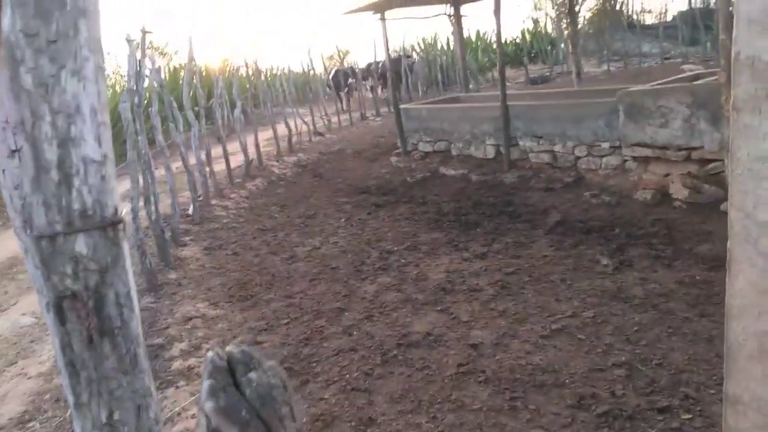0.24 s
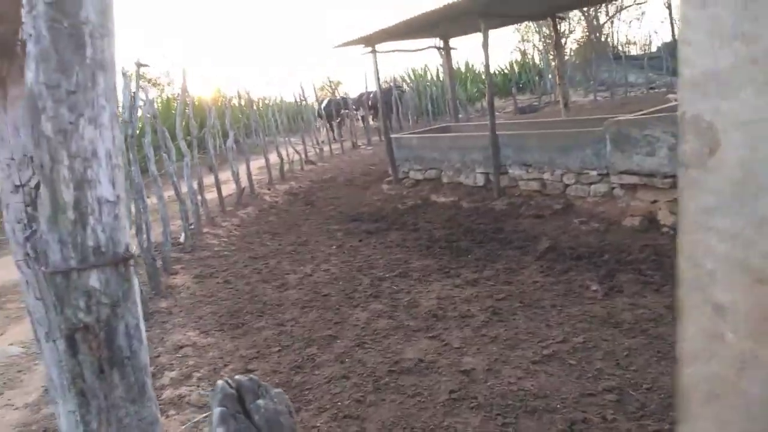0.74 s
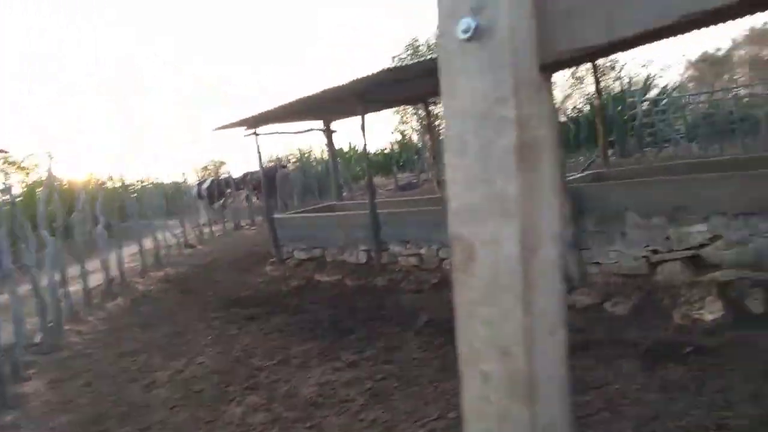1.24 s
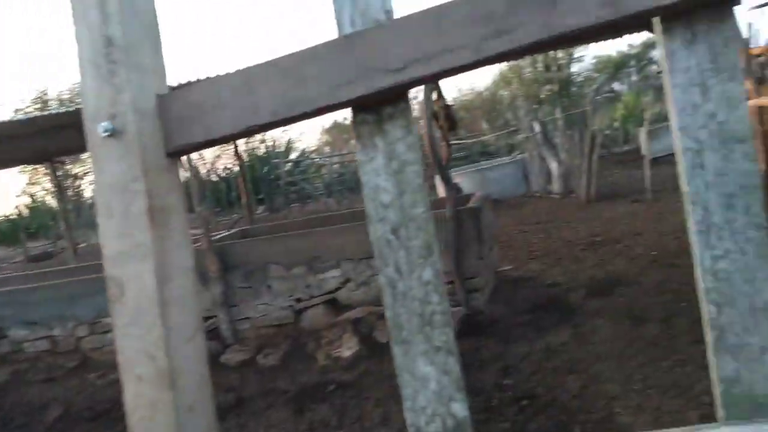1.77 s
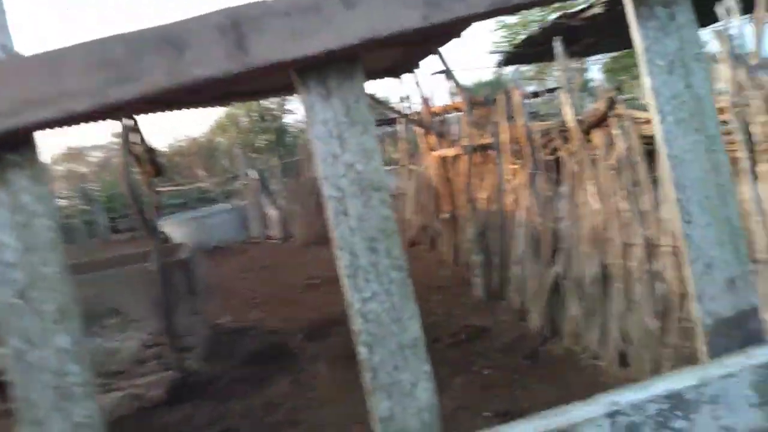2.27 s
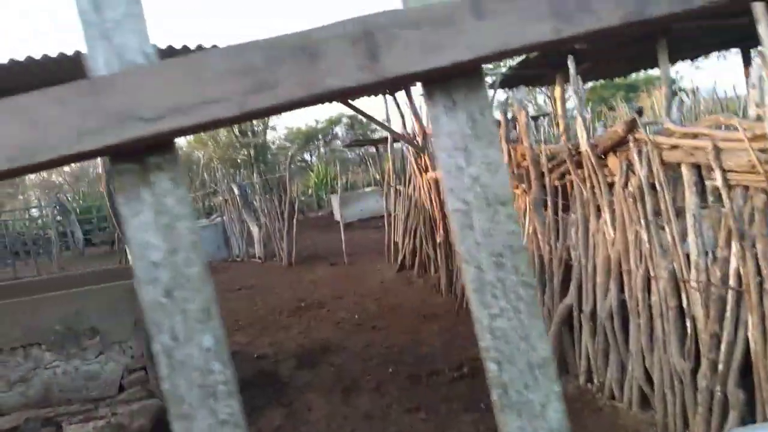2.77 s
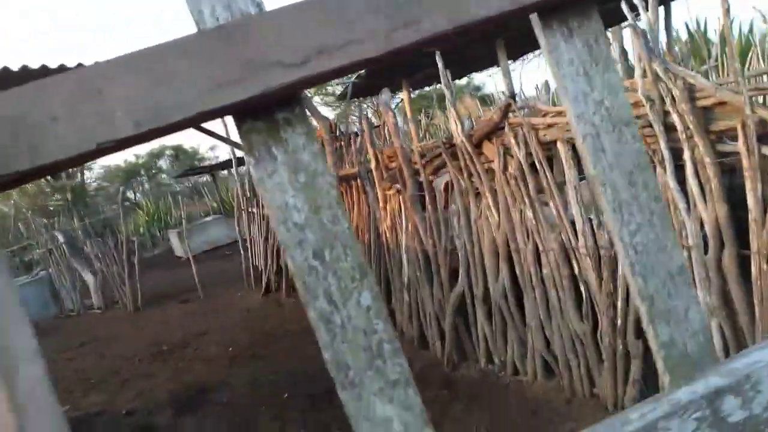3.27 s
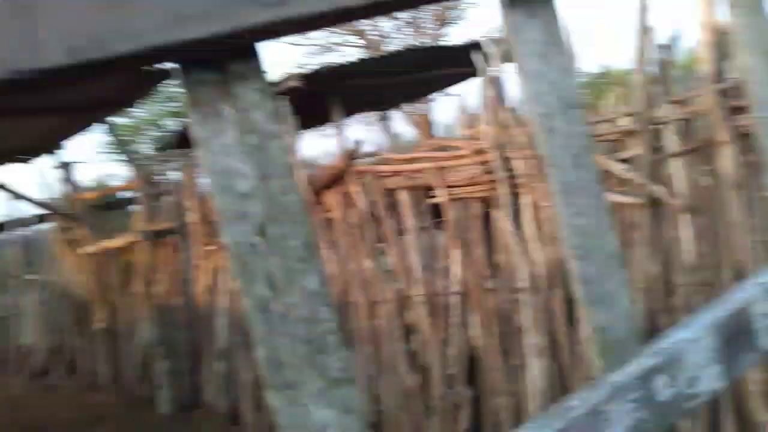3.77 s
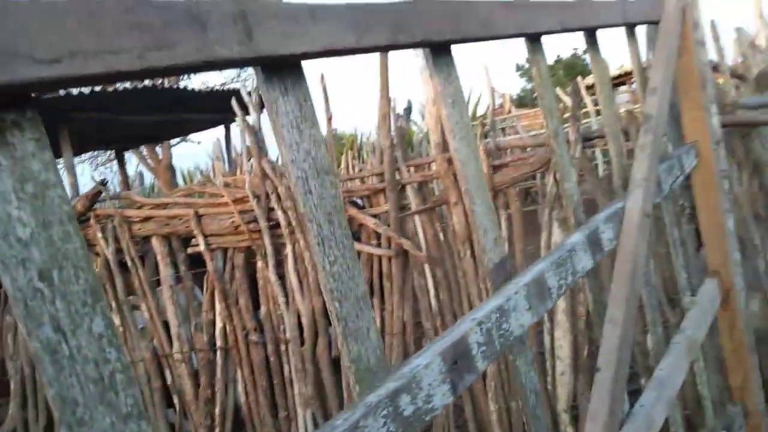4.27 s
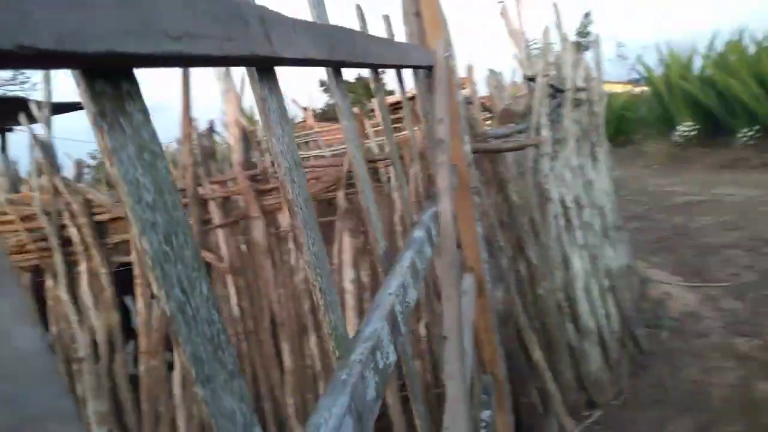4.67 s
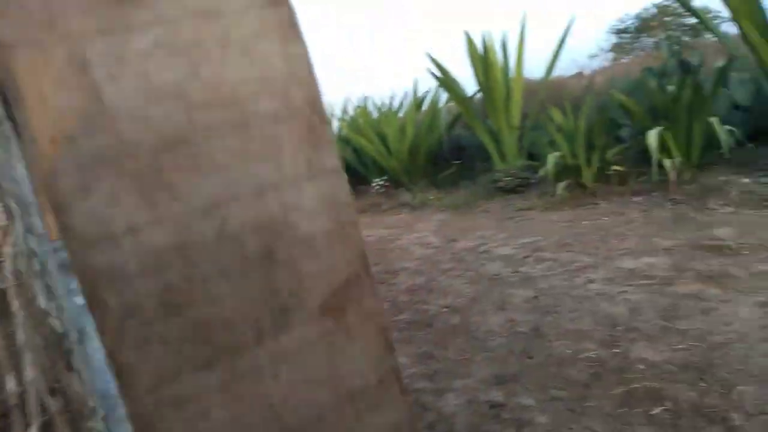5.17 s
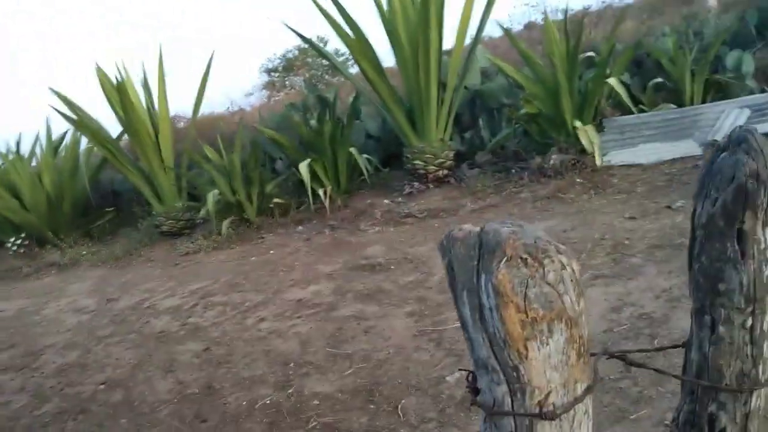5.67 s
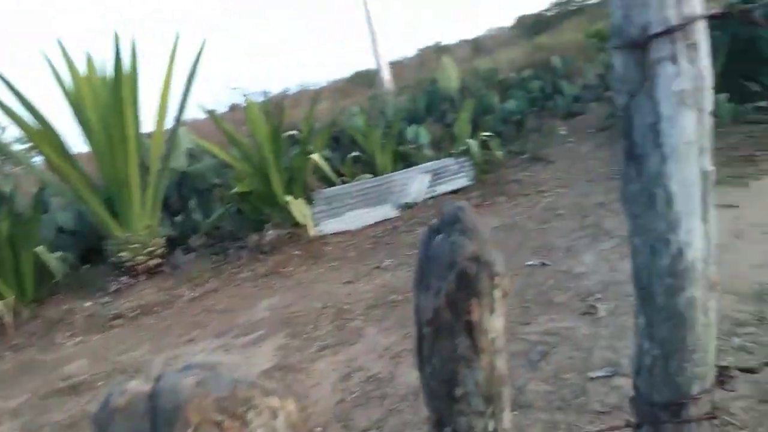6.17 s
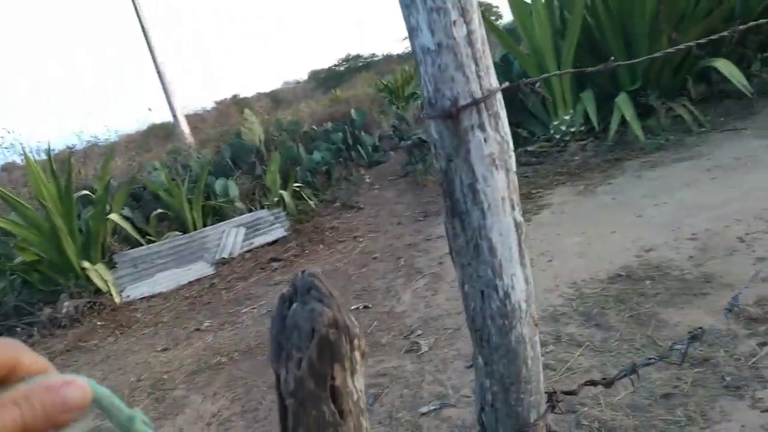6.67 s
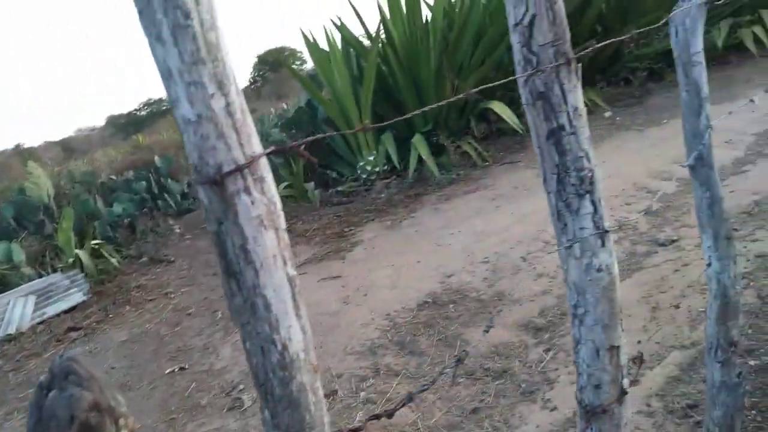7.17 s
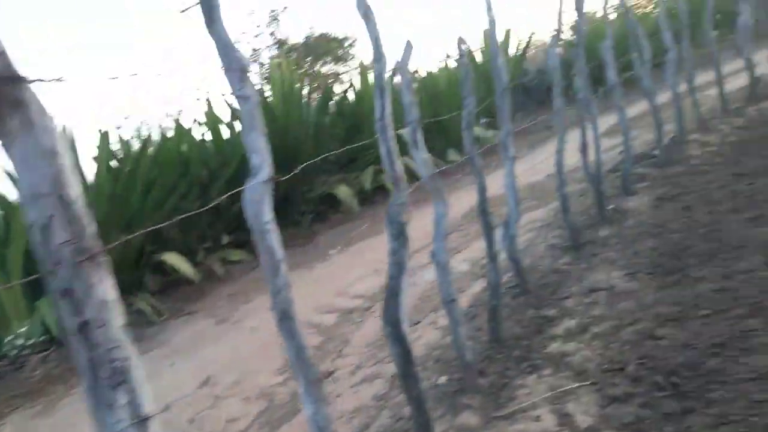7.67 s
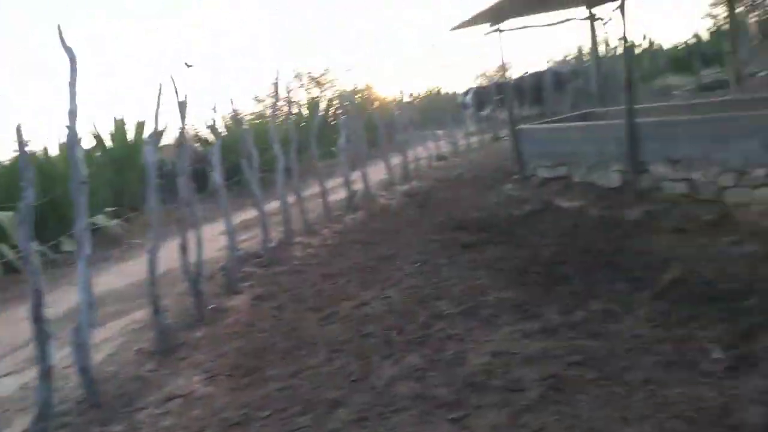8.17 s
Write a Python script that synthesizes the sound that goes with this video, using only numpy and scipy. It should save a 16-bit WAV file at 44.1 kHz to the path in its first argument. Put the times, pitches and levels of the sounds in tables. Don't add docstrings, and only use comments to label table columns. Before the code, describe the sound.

Outdoor cattle pen: a near cow moos, wind buffets the microphone, a wooden gate creaks, another low moo, then a hard wooden knock.

```python
import sys
import numpy as np
from scipy import signal
from scipy.fft import rfft, irfft, next_fast_len
from scipy.io import wavfile
from scipy.ndimage import uniform_filter1d

SR = 44100
rng = np.random.default_rng(int(sys.argv[2]) if len(sys.argv) > 2 else 0)


def nominal_scale(level):
    x = np.asarray(level, float) / 20
    return 10 ** x


def dump_mix(stems):
    frames = np.atleast_2d(stems).T
    limited = np.clip(frames, -1, 1)
    pcm = np.round(limited * 32767).astype(np.int16)
    wavfile.write(sys.argv[1], SR, pcm)


N = 372204


def evened(x):
    return x / np.sqrt(np.mean(x ** 2) + 1e-20)


def read(points, hz):
    f, value = np.transpose(points)
    return np.interp(np.log(hz + 1), np.log(f + 1), value)


def add(mix, s, sound):
    part = mix[..., max(round(s * SR), 0):][..., :sound.shape[-1]]
    part += sound[..., :part.shape[-1]]


def drift(size, per_s):
    knots = rng.standard_normal(int(size / SR * 200) + 3)
    return np.interp(np.arange(size) / SR * per_s, np.arange(len(knots)), knots)


def filtered(x, response):
    size = next_fast_len(x.shape[-1] + 4096)
    spectrum = rfft(x, size) * response(np.fft.rfftfreq(size, 1 / SR))
    return irfft(spectrum, size)[..., :x.shape[-1]]


def ports(x, lag_ms, tilt_db):
    right = filtered(x, lambda hz: np.exp(-2j * np.pi * hz * lag_ms / 1000))
    return np.array([x * nominal_scale(tilt_db / 2), right * nominal_scale(-tilt_db / 2)])


def ring(points):
    log_gain = read(points, np.fft.rfftfreq(2048, 1 / SR)) * np.log(10) / 20
    full = np.concatenate([log_gain, log_gain[-2:0:-1]])
    return np.fft.ifft(np.exp(np.conj(signal.hilbert(full)))).real[:1024]


def yard(x, t60, start_ms):
    t = np.arange(SR // 2) / SR
    taps = rng.standard_normal((2, len(t))) * (rng.random((2, len(t))) < .05)
    taps = taps * nominal_scale(-60 * t / t60) * (t > start_ms / 1000)
    wet = signal.fftconvolve(x[None], taps / np.linalg.norm(taps[0]), axes=1)[:, :N]
    return filtered(wet, lambda hz: 1 / (1 + (hz / 3500) ** 2))


def swells(rows, rest_db):
    t = np.arange(0, N + 256, 256) / SR
    power = sum(nominal_scale(db - 20 * abs((t - s) / sink_s) ** 1.3) ** 2 for s, db, sink_s in rows)
    return np.interp(np.arange(N) / SR, t, 10 * np.log10(power + nominal_scale(rest_db) ** 2))


def moo(rows, mouth, throat, order, gain_db, jitter, breath_db):
    s, *columns = np.transpose(rows)
    t = np.arange(s[0], s[-1], 1 / SR)
    hz, level_db, bright_db = (np.interp(t, s, c) for c in columns)
    at, opening, scale = np.transpose(mouth)
    wide = np.clip(np.interp(t, at, opening), 0, 1)
    shift = np.interp(t, at, scale)

    def colour(f):
        return (1 - wide) * read(throat[0], f) + wide * read(throat[1], f / shift)

    def lift(f):
        return bright_db * np.clip(np.log2(f / 450), -1, 1) / 2

    def end_loss(f):
        return -2.5 * f / 1000 + 20 * np.minimum(np.log2(f / 165), 0)

    turns = np.cumsum(hz * (1 + jitter * drift(len(t), 59.85))) / SR
    puffs = uniform_filter1d(rng.standard_normal(len(t)), 60) * 8 * nominal_scale(breath_db)
    voice = np.zeros(len(t))
    for k in range(1, 30):
        db = level_db + gain_db + colour(k * hz) - colour(order * hz)
        db = db + lift(k * hz) + end_loss(k * hz) + 1.57 * drift(len(t), 12.96)
        tone = np.sqrt(2) * np.cos(2 * np.pi * (k * turns + rng.random()))
        voice += nominal_scale(db) * (1 + np.roll(puffs, 977 * k)) * tone
    out = np.zeros(N)
    add(out, s[0], voice * signal.windows.tukey(len(t), .05))
    return out


def near_cows():
    # (time [s], pitch [Hz], level of the reference harmonic [dB], brightness [dB])
    call_a = [(.36, 89.9, -59, -12), (.52, 106.9, -54.5, -13), (.565, 127.8, -40.5, -5.5),
              (.675, 158.6, -38.5, 13), (.76, 163.7, -41.5, 21), (1.12, 165.7, -41.5, 17.5),
              (1.35, 170.2, -49, 11), (1.44, 174.2, -53.5, 8), (1.53, 167.7, -56, 12)]
    call_b = [(5.6, 107, -86, -16), (5.77, 126.5, -68, -3), (6.1, 142.3, -61.5, -1.5),
              (6.22, 141.4, -58.5, -0.5), (6.3, 143.1, -48, -1.5), (6.6, 142, -50.5, -4.5),
              (6.712, 136.8, -53.5, -11.5), (6.76, 123, -56.5, -20), (6.79, 113, -72.5, -27)]
    groan = [(1.46, 161.6, -57, 20), (1.52, 156.4, -52.5, 17), (1.585, 155.7, -51, 14.5),
             (1.7, 159.5, -65, 13), (1.8, 169.8, -58, 11), (1.9, 175.4, -64, 7.6), (2.0, 178.5, -70, 6.1)]
    # (time [s], 0 narrow - 1 wide, upward shift of the resonances [ratio])
    mouth_a = [(.9, .05, 1.0), (1.1, .4, 1.0), (1.28, .95, 1.0), (1.43, .9, 1.0), (1.51, .05, 1.0)]
    mouth_b = [(5.9, 0.013, 1.4), (6.23, 0.071, 0.93), (6.28, 0.65, 1.054), (6.5, 0.75, 1.045),
               (6.7, 0.8, 1.093), (6.76, 0.71, 1.1), (6.802, 0.99, 0.94)]
    # (frequency [Hz], level [dB])
    throat_a = [(163, 7.5), (326, -2.5), (489, -23.5), (652, -65), (815, -40.5), (978, -23), (1141, -30),
                (1304, -33), (1630, -39), (1956, -36.5), (2282, -44), (2771, -43), (3423, -51),
                (4564, -47)], [(169, 5), (338, -14.5), (507, -26.5), (676, -30.5), (845, -40),
                (1014, -39.5), (1183, -26), (1352, -39), (1521, -35.5), (1690, -37), (2028, -37),
                (2366, -46), (2873, -59), (3549, -60.5), (4732, -69)]
    throat_b = [(140, 2.5), (281, -15.5), (422, -20.5), (562, -32), (702, -24), (843, -36), (984, -25.5),
                (1124, -30.5), (1405, -20.5), (1686, -43), (1967, -45), (2388, -35), (2950, -31),
                (3934, -38)], [(142, -11.5), (284, -30), (426, 4.5), (495, 1), (568, -19), (710, -15),
                (852, -37.5), (994, -16), (1136, -17.5), (1420, -5), (1704, -7.5), (1880, 0.5), (2100, -21),
                (2414, -23), (2982, -31), (3976, -28)]
    throat_groan = [[(160, 2), (320, -6.5), (480, -25), (780, -47), (960, -20), (1080, -25.5), (1150, -37),
                    (1400, -44.5)]] * 2
    a = moo(call_a, mouth_a, throat_a, order=2, gain_db=4.5, jitter=.006, breath_db=-30.5)
    a = a + moo(groan, mouth_a, throat_groan, order=2, gain_db=2, jitter=.0052, breath_db=-25)
    b = moo(call_b, mouth_b, throat_b, order=10, gain_db=-1.5, jitter=.0031, breath_db=-45)
    return ports(a, -.06, 1.5) + ports(b, -.05, 1.6) + nominal_scale(-11) * yard(a + b, .4, 6)


def far_hum():
    # (time [s], pitch [Hz], level [dB])
    hums = [
        [(0.0, 132.6, -59), (0.332, 137.8, -55), (0.62, 151, -53)],
        [(2.6, 158, -66), (3.062, 152.2, -57), (3.7, 132.6, -62.5)],
        [(3.9, 146.7, -63.5), (4.394, 150.9, -66.5), (5.75, 141, -61.5)],
    ]
    out = np.zeros(N)
    for rows in hums:
        s, hz, db = np.transpose(rows)
        t = np.arange(s[0], s[-1], 1 / SR)
        wavering_hz = np.interp(t, s, hz) * (1 + .011 * drift(len(t), 28.1))
        phase = 2 * np.pi * np.cumsum(wavering_hz) / SR
        tone = np.sin(phase) + nominal_scale(-20.5) * np.sin(2 * phase)
        level = nominal_scale(np.interp(t, s, db) + 14.5 + 1.9 * drift(len(t), 11.76))
        add(out, s[0], tone * level * signal.windows.tukey(len(t), .15))
    return ports(out, .05, .1)


def hinge_slips():
    # (time [s], peak level [dB])
    single = [(2.184, -23.5), (2.266, -25.5), (2.354, -29), (2.43, -24.5), (2.486, -32.5), (2.525, -27),
              (2.563, -25), (2.602, -24), (2.641, -23.5), (2.673, -28.5), (2.695, -30), (2.713, -34.5),
              (2.726, -31.5), (2.75, -33), (3.171, -37.5), (3.189, -33), (3.211, -36), (3.23, -34),
              (3.253, -36.5), (3.286, -33.5), (3.306, -37.5), (3.339, -36), (3.382, -35), (3.434, -33.5),
              (3.478, -35.5), (3.521, -34.5), (3.566, -32), (3.6, -33.5), (3.697, -35), (3.738, -32.5)]
    # (time [s], peak level [dB])
    quick = [(2.768, -38.5), (2.786, -40), (2.807, -44), (2.824, -42.5), (2.843, -47), (2.861, -44),
             (2.874, -42), (2.8961, -42), (2.9147, -44.5), (2.929, -44), (2.947, -44.5), (2.959, -47),
             (2.972, -42.5), (2.992, -45), (3.01, -41.5), (3.026, -43), (3.047, -46), (3.062, -45),
             (3.076, -48), (3.088, -46.5), (3.104, -41.5), (3.117, -44.5), (3.128, -45.5), (3.143, -44),
             (3.157, -42), (3.62, -42), (3.639, -44), (3.657, -42), (3.678, -46.5), (3.718, -46)]
    # (start [s], end [s], gap between slips [s], first level [dB], last level [dB])
    rasps = [(3.752, 3.868, .0145, -41.5, -52)]
    rub_single, rub_rasp = .2, .9
    slips = [(s, db, rub_single) for s, db in single] + [(s, db, rub_rasp) for s, db in quick]
    for start, end, gap_s, first_db, last_db in rasps:
        nudge = rng.uniform(-1, 1, 20)
        s = start + gap_s * (np.arange(20) + .22 * nudge)
        db = np.interp(s, [start, end], [first_db, last_db]) + 1.2 * rng.standard_normal(20)
        slips += [(at, level, rub_rasp) for at, level in zip(s, db) if at < end]
    return slips


def gate():
    # (frequency [Hz], level at slow swing [dB], level at quick swing [dB], time to fall 110
    # dB [s])
    modes = [(560, -4.5, -7, 0.043), (777, -5.5, -2, 0.055), (990, 2, 2.5, 0.078), (1220, -6, -4.5, 0.054),
             (1660, 10.5, 3, 0.038), (1795, -1, 5, 0.036), (1960, -0.5, 6, 0.024),
             (3450, -11.5, -6.5, 0.018), (2370, -9.5, -1.5, 0.048), (2950, -17, -10.5, 0.01),
             (3820, -19.5, -7.5, 0.0061), (5050, -19.5, -13, 0.014), (5360, -23, -12, 0.01),
             (6065, -13, -11.5, 0.0096)]
    snap_gain, loose = 4.5, .55
    rounds_per_s = 7.3
    t = np.arange(1200) / SR
    shape = (t / .0036) ** 2 * np.exp(2 - t / .0015)
    snap = np.exp(-((t - .0025) * SR / 1.5) ** 2)
    drive = np.zeros((2, N))
    for s, db, rub in hinge_slips():
        quick = np.clip((s - 2.45) / .24, 0, 1)
        grind = shape + rub * quick * np.exp(-t / .014)
        rattle = (loose + (1 - loose) * quick) * rng.standard_normal(len(t)) * grind
        slip = (snap_gain * (1 - .5 * quick) * snap + rattle) * nominal_scale(db)
        add(drive, s - .002, np.array([[1 - quick], [quick]]) * slip)

    t = np.arange(4000) / SR
    bare_tick = drive.sum(0)
    creak = nominal_scale(-19) * bare_tick
    for k, (hz, slow_db, quick_db, t60) in enumerate(modes):
        mode = (-1) ** k * nominal_scale(-110 * t / t60) * np.sin(2 * np.pi * hz * t) * .024 / t60
        creak = creak + nominal_scale(-19) * signal.oaconvolve(nominal_scale([slow_db, quick_db]) @ drive, mode)[:N]

    def board_colour(hz):
        return nominal_scale(12.5) * (hz / 380) ** 2 / (1 + (hz / 380) ** 2) / (1 + (hz / 1700) ** 2)

    boards = filtered(bare_tick, board_colour)
    dull = filtered(nominal_scale(-13) * creak + boards, lambda hz: 1 / (1 + (hz / 2300) ** 2))
    turn = np.pi * rounds_per_s * np.arange(N) / SR
    tail = sum(yard(dull * np.cos(turn + k * np.pi / 3), .16, 3) for k in range(3))
    left, right = ports(creak, .4303, 7)
    right = filtered(right, lambda hz: nominal_scale(-8.5 * np.exp(-((hz - 1750) / 380) ** 2)))
    direct = np.array([left, right]) * nominal_scale(-2)
    return direct + nominal_scale(-9) * yard(creak, .028, .6) + nominal_scale(-5.5) * tail


def knocks():
    # (time [s], peak level [dB], main ring [Hz], t60 [s], lag of the right port [ms])
    blows = [
        (0.608, -45, 1050, 0.11, 0.051),
        (0.897, -17.5, 998, 0.41, 0.12),
        (0.906, -21, 560, 0.34, 0.2),
        (3.742, -35, 990, 0.045, 0.012),
        (6.8186, -9.5, 968, 0.24, -0.06),
        (6.851, -20.5, 600, 0.073, -0.32),
        (6.882, -26.5, 895, 0.11, -0.39),
        (8.041, -35.5, 1480, 0.015, -0.021),
    ]
    # (frequency [Hz], level [dB])
    wood_colour = [(200, 1.5), (300, 8), (500, -1), (750, -4.5), (1000, -6), (1300, -9), (1650, -5),
                   (2000, -6), (2500, -14.5), (3200, -23.5), (4000, -17), (5000, -26.5), (7000, -34.5),
                   (10000, -31), (14000, -48)]
    out = np.zeros((2, N))
    t = np.arange(5000) / SR
    wood = ring(wood_colour)
    wood = wood / np.linalg.norm(wood)
    for s, db, hz, t60, lag_ms in blows:
        force = t / .003 * np.exp(1 - t / .003) + .25 * nominal_scale(-60 * t / t60)
        body = signal.oaconvolve(rng.standard_normal(len(t)) * force, wood)[:len(t)]
        swell = np.sin(np.pi * np.minimum(t / .0062, 1) ** 1.32) ** .71
        tone = .52 * np.sin(2 * np.pi * hz * t * (1.18 - 25 * t)) * swell
        knock = nominal_scale(db - 2.5) * (.3 * body + tone) * np.minimum(t * 1000, 1)
        add(out, s - .001, ports(knock, lag_ms, 2.5))
    return out + nominal_scale(-16.5) * yard(out[0], .017, .5) + nominal_scale(-12) * yard(out[0], .094, 6.8)


def scuffs():
    # (time [s], peak level [dB], centre [Hz], length [s], width [octaves])
    bursts = [(0.138, -48, 1290, 0.035, 0.61), (0.186, -58, 1700, 0.092, 1.4),
              (0.159, -57, 1540, 0.08, 0.14), (0.42, -58.5, 1700, 0.036, 1.3),
              (1.694, -51.5, 660, 0.02, 0.42), (1.987, -54.5, 648, 0.028, 0.25),
              (0.323, -53.5, 1430, 0.055, 1), (0.606, -39.5, 1150, 0.032, 1),
              (0.816, -43.5, 2700, 0.015, 0.36), (0.825, -54, 1988, 0.11, 1.51),
              (1.075, -55, 3640, 0.017, 0.097), (1.317, -42, 1480, 0.023, 0.33),
              (4.278, -58.5, 1140, 0.11, 0.66), (4.632, -60, 1407, 0.055, 1.4),
              (5.229, -52.5, 1117, 0.043, 0.57), (5.271, -58.5, 1070, 0.33, 0.73),
              (5.271, -50.5, 1290, 0.017, 0.5), (5.309, -60, 1500, 0.012, 0.55),
              (5.383, -51, 1500, 0.013, 0.56), (5.357, -55, 1520, 0.061, 0.63),
              (5.722, -53, 1240, 0.026, 0.69), (5.826, -62, 3200, 0.13, 0.42),
              (5.87, -64, 5000, 0.069, 0.25), (5.936, -60, 3200, 0.068, 0.24),
              (5.97, -59, 4930, 0.043, 0.2), (6.334, -58.5, 5100, 0.08, 0.47),
              (6.037, -45, 1280, 0.051, 0.84), (6.042, -47, 3770, 0.031, .5),
              (7.004, -61, 3200, .016, 0.35), (7.048, -57.5, 3720, 0.013, 0.22),
              (7.249, -62, 1490, 0.03, 0.5), (7.291, -56, 1300, 0.18, 0.81), (7.341, -51, 1620, 0.058, 1.5),
              (7.4, -60, 3600, 0.0099, .3), (7.448, -59, 2800, 0.068, 1.3),
              (7.455, -57.5, 1360, 0.057, 0.61), (7.652, -61, 2760, 0.087, 1.2),
              (7.769, -58.5, 900, 0.023, 0.74), (7.88, -58.5, 1220, 0.046, 1),
              (7.922, -41, 8900, 0.0029, 1.1), (7.955, -58, 8000, 0.0072, .4),
              (7.988, -57.5, 1320, 0.089, 1), (8.077, -60.5, 3500, 0.026, 1),
              (8.165, -57, 2190, 0.0079, 0.45)]
    out = np.zeros((2, N))
    t = np.arange(6000) / SR
    for s, db, hz, length, octaves in bursts:
        lumps = uniform_filter1d(rng.standard_normal(len(t)), 90) * 8
        grains = rng.standard_normal((2, len(t))) * nominal_scale(3.6 * lumps)
        band = filtered(grains, lambda f: 1 / (1 + (np.log2((f + 1) / hz) / octaves) ** 2))
        envelope = np.exp(-(t / length) ** 2) * np.minimum(t / (.15 * length), 1)
        add(out, s - .003, nominal_scale(db - 2) * evened(band) * envelope)
    return out


def birds():
    # (time [s], pitch [Hz], level [dB])
    peeps = [
        [(.12, 2900, -58), (.128, 3400, -47.5), (.137, 3900, -58)],
        [(.15, 3040, -53), (.17, 3660, -41), (.19, 3720, -48)],
        [(.15, 3960, -46), (.17, 4380, -40.5), (.187, 4200, -62)],
        [(7.62, 6400, -68), (7.65, 6840, -67), (7.72, 6530, -60), (7.82, 6350, -65)],
        [(7.92, 5700, -64), (7.97, 5400, -65), (8.06, 4900, -65)],
        [(7.63, 5160, -67), (7.78, 4710, -64), (7.88, 4540, -66)],
        [(7.845, 7770, -69), (7.86, 7700, -55), (7.88, 7600, -67)],
    ]
    out = np.zeros((2, N))
    for rows in peeps:
        s, hz, db = np.transpose(rows)
        t = np.arange(s[0], s[-1], 1 / SR)
        level = nominal_scale(np.interp(t, s, db) - 15 + 7 * drift(len(t), 180))
        tone = np.sin(2 * np.pi * np.cumsum(np.interp(t, s, hz)) / SR) * level
        add(out, s[0], ports(tone * signal.windows.tukey(len(t), .3), .18, 9))
    return out


def wind_pops():
    # (time [s], peak level [dB], pitch [Hz])
    eddies = [(0.996, -9, 118.4), (1.035, -3.5, 166), (1.364, -6.5, 115), (1.542, -15, 143),
              (1.626, -17, 110), (1.648, -12, 128), (1.708, -1, 130), (1.773, -11, 146),
              (1.812, -12, 139.6), (1.846, -3.5, 130), (1.874, -7, 163), (1.949, -13, 149),
              (1.983, -7.5, 192), (1.996, 0, 173), (2.026, -11.5, 144), (2.077, -7, 181), (2.092, -4, 172),
              (2.222, -16, 176), (2.306, -18.5, 110), (2.61, -23, 100), (3.385, -22.5, 93),
              (8.005, -16, 146), (8.06, -26, 121), (7.693, -13.5, 131), (7.886, -11, 101),
              (8.095, -13, 116)], [ (1.129, -16, 131), (1.164, -9, 134), (1.399, -12.5, 123.2),
              (1.745, -6, 125), (1.795, -14.5, 191), (1.906, -7.5, 151), (6.493, -14, 141),
              (6.513, -22, 148.6), (6.534, -12, 127.3), (6.554, -9.5, 178), (6.59, -27, 148.2),
              (6.93, -17, 150), (6.975, -21, 116), (7.32, -23, 117), (7.405, -20, 156), (7.51, -16, 117),
              (6.576, -12, 112), (6.855, -2, 185), (6.899, -6.5, 133), (6.939, -15, 143),
              (7.09, -19.5, 96.5), (7.276, -7, 113), (7.48, -11, 179)]
    out = np.zeros((2, N))
    u = np.arange(-600, 2400) / SR
    for port, rows in zip(out, eddies):
        for s, db, hz in rows:
            cycles = u * hz
            phase = 2 * np.pi * (cycles - .209 * cycles * abs(cycles)) + rng.uniform(-.96, 1)
            ragged = 1 + .2 * drift(len(u), 894)
            envelope = np.exp(-abs(cycles) * np.where(u < 0, 3.5, .9))
            add(port, s - 600 / SR, nominal_scale(db) * ragged * -np.cos(phase) * envelope)
    return out


def wind():
    # (middle [s], peak level [dB], time to sink 20 dB [s])
    gusts = [(0.0, -36, 3), (1.02, -20, 0.76), (1.68, -12, 0.25), (2.04, -10, 0.37), (2.24, -28.5, 2),
             (2.58, -26.5, -0.5), (3.3, -44, 0), (5.5, -35.5, -0.2), (7.0, -31.5, 0.5), (7.7, -52, 1),
             (8.03, -14.5, 0.18), (8.3, -29, 0.8)], [(.55, -42.5, -10), (.84, -50, 2.3), (1.08, -37, 5),
             (1.48, -17.5, 0.3), (1.92, -19, 0.5), (2.28, -22, -0.22), (2.55, -36, -0.3), (3.4, -37, 0),
             (5.76, -31, -0.4), (6.5, -42.5, 1), (6.85, -25, 1), (7.3, -24, -0.57), (7.53, -19, 0.27),
             (8.18, -35, -4.5)]
    # (frequency [Hz], level [dB])
    rumble_colour = [(40, 7), (70, 7), (110, 2), (170, -3), (260, -14.5), (400, -35.5), (700, -33),
                     (1200, -32)]
    rumble = evened(filtered(rng.standard_normal((2, N)), lambda hz: nominal_scale(read(rumble_colour, hz))))
    rumble = rumble * nominal_scale([swells(rows, -64.5) - 4 + 3 * drift(N, 25) for rows in gusts])
    pressed = np.tanh(1.604 * (rumble + wind_pops())) / 1.6
    return filtered(pressed, lambda hz: 1 / (1 + (hz / 450) ** 3))


def air():
    # (frequency [Hz], level [dB])
    floor_colour = [(40, -6.5), (70, -3), (110, -8), (170, -11.5), (260, -17.5), (400, -22.5), (700, -29),
                    (1200, -31.5), (2000, -29.5), (3500, -36), (6000, -38), (10000, -42.5), (14000, -46)]
    # (middle [s], peak level [dB], time to sink 20 dB [s])
    rustles = [(.37, -78, -4.5), (.77, -69.5, 0.23), (1.4, -63, 0.44), (3.28, -68, 1.43), (4.76, -72, 0.28),
               (5.85, -71.5, 0.52), (6.06, -72.5, 0.5), (6.45, -69, 0.94), (7.36, -78.5, 1),
               (7.99, -72, 0.5)]
    own, shared = rng.standard_normal((2, N)), rng.standard_normal(N)
    far = own + 1.3 * filtered(shared, lambda hz: 1 / (1 + (hz / 1500) ** 2))
    floor = evened(filtered(far, lambda hz: nominal_scale(read(floor_colour, hz))))
    floor = floor * nominal_scale(1.5 * drift(N, 9))
    hiss = filtered(rng.standard_normal((2, N)), lambda hz: (hz / 7000) ** 1.8 / (1 + (hz / 7000) ** 2.17))
    level_db = swells(rustles, -93)
    rustle = evened(hiss) * nominal_scale(level_db + 3 + 5.05 * drift(N, 33))
    return floor * nominal_scale(-51.5 + .28 * (level_db + 79)) + rustle


def scene():
    return near_cows() + far_hum() + gate() + knocks() + scuffs() + birds() + wind() + air()


def roll_off(x):
    return signal.sosfilt(signal.butter(12, 15440, fs=SR, output="sos"), x)


def record(dry):
    lag_s = 21.13 / 44100

    def cross_path(hz):
        return .86 * np.exp(-2j * np.pi * hz * lag_s) / (1 + (hz / 8500) ** 2)

    def band_limits(hz):
        return 1 / (1 + (hz / 14400) ** 80) / (1 + (42 / (hz + 1)) ** 5)

    wide = filtered(dry - filtered(dry[::-1], cross_path), band_limits)
    return roll_off(wide)


dry = scene()
out = record(dry)
dump_mix(out)
```